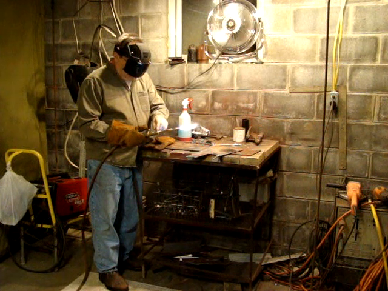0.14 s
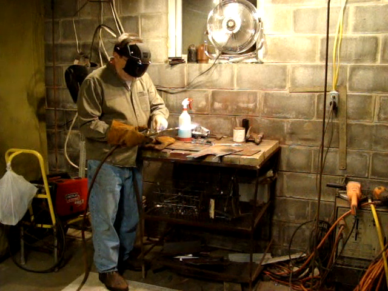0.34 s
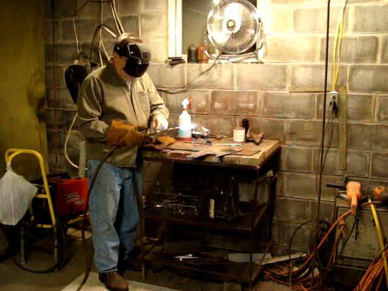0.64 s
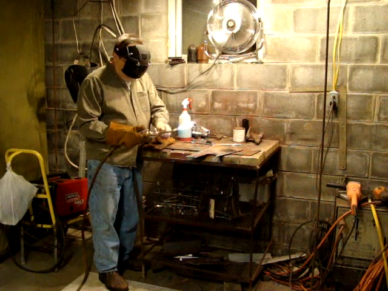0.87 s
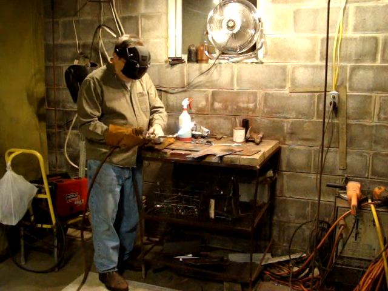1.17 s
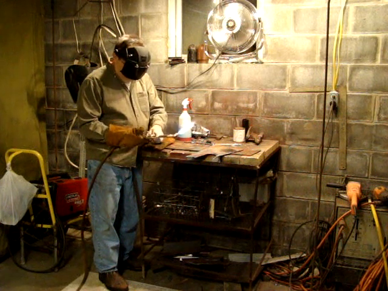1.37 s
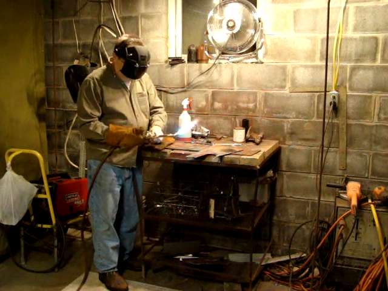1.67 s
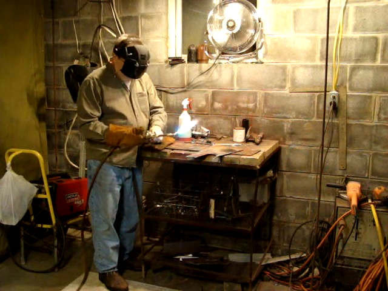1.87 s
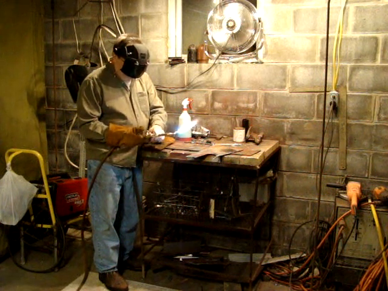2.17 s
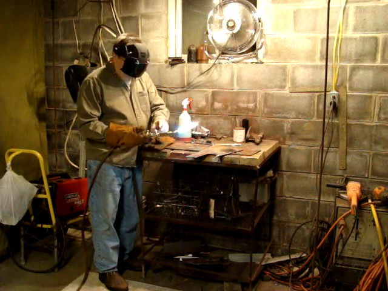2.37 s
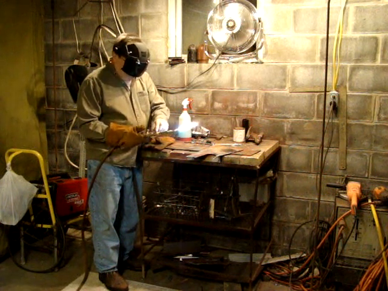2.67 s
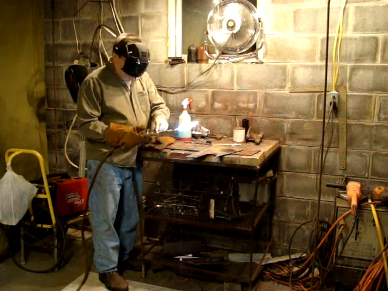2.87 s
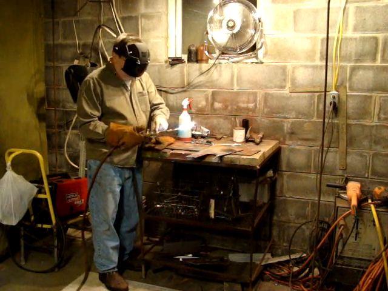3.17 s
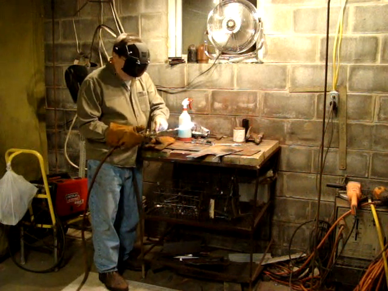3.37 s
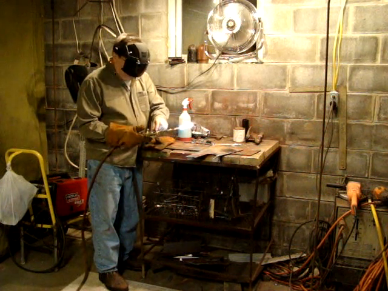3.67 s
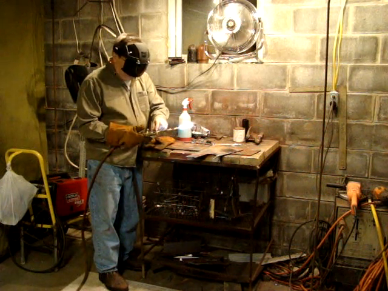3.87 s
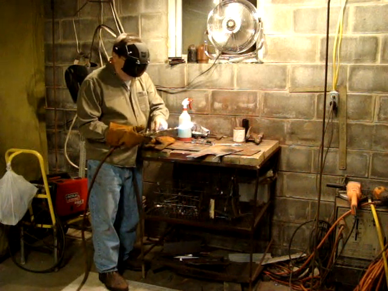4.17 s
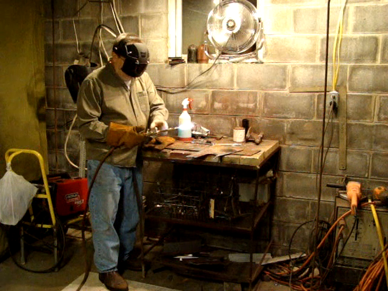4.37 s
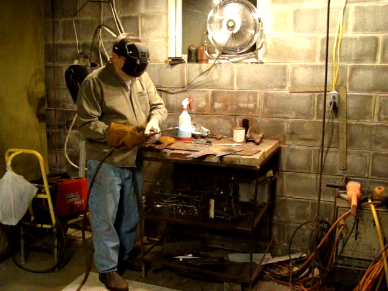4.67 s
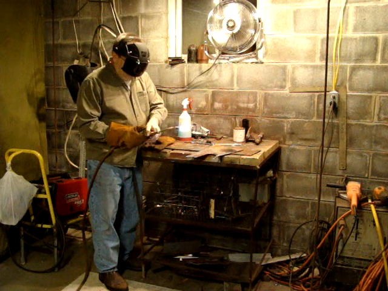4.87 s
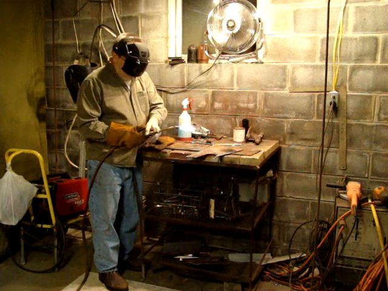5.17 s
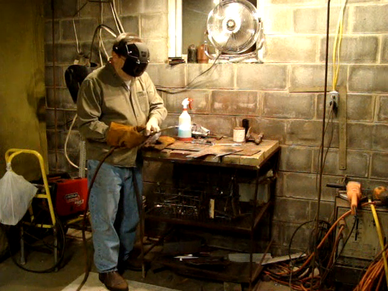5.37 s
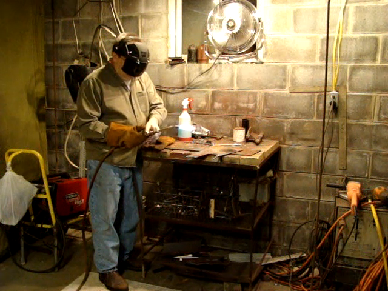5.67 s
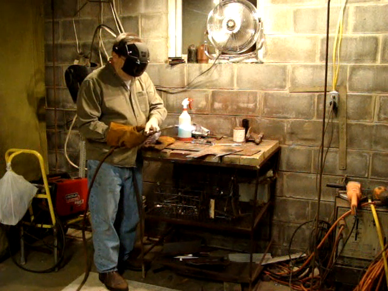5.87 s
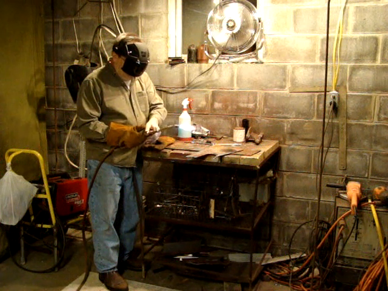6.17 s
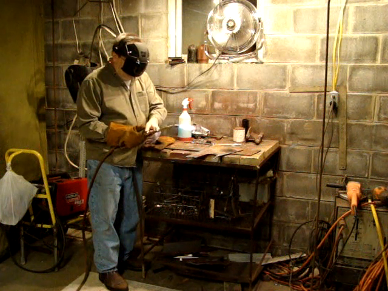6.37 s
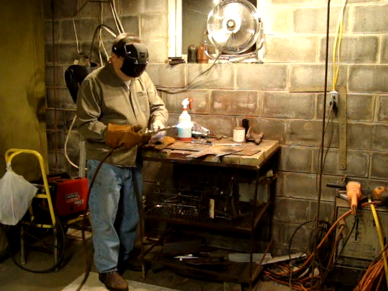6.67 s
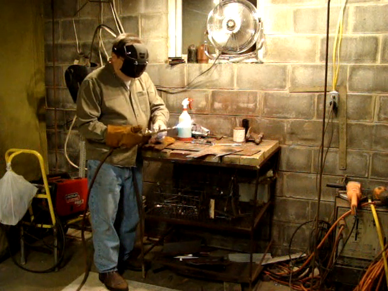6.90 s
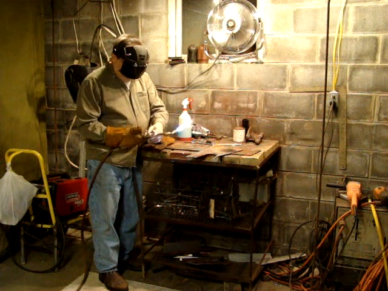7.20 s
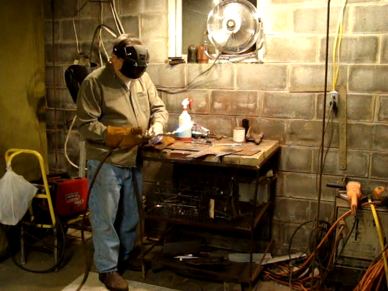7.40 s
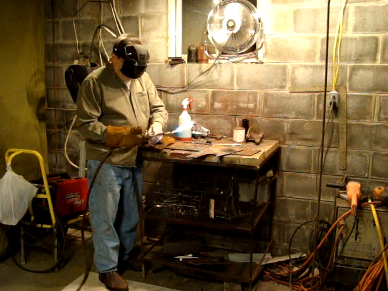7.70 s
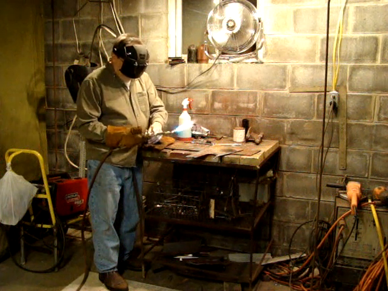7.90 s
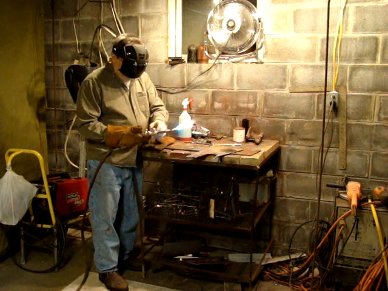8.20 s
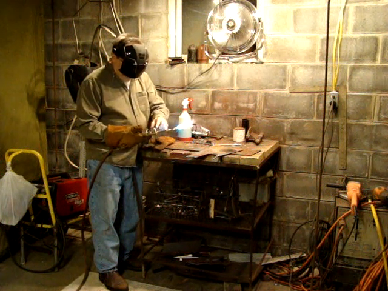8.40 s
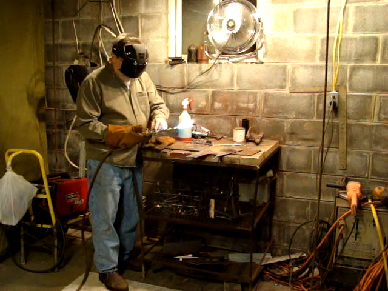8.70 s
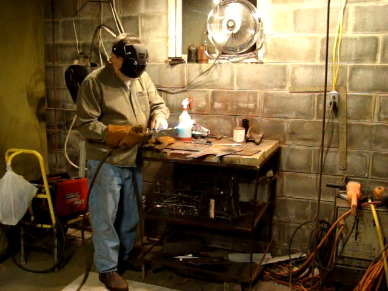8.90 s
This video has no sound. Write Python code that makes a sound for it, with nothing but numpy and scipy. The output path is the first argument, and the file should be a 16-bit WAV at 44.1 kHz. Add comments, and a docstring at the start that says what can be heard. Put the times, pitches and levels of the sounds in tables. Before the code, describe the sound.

A gas torch burns from the start with a steady, bright, slightly flickering hiss. Behind it a window fan whirs softly, with a faint wavering tone that fades somewhat over the first few seconds. From about 3.1 to 3.6 seconds the flame takes on a slightly fuller roar as it plays on steel, and it keeps that roar. At 5.0 seconds a loud, sharp blast of oxygen rushes out for about a quarter of a second, and a second one follows from 5.4 to 5.7 seconds. The torch and fan sound briefly quieter after each blast, creeping back to their earlier level by about 6.3 seconds. The hiss and roar then continue evenly until the end, at around 9 seconds. The place is a small basement workshop with hard walls, which add a short echo and a slightly hollow colour to the rushing sounds.

```python
"""In a small block-walled basement, a window fan whirs and sings while an oxy-acetylene torch burns.
Turbulent gas hisses at the nozzle, and the flame roars more once it plays on the steel. Two presses of
the oxygen lever let out loud jet blasts, at which an automatic gain ducks and then creeps back.
Standing waves colour the rushing noises; the torch also echoes off nearby surfaces and the walls."""
import sys
import numpy as np
from scipy import signal
from scipy.fft import rfft, irfft, next_fast_len
from scipy.io import wavfile
from scipy.ndimage import map_coordinates

SR = 44100
rng = np.random.default_rng(int(sys.argv[2]) if len(sys.argv) > 2 else 0)


def waveform_to_disk(signal):
    """Save audio, clipped to [-1, 1], as 16-bit WAV at the path in sys.argv[1]."""
    frames = np.transpose(np.atleast_2d(signal))
    scaled = np.clip(frames, -1, 1) * 32767
    samples = np.round(scaled).astype(np.int16)
    wavfile.write(sys.argv[1], SR, samples)


N = 399105
TIME = np.arange(N) / SR


def from_db(db):
    """Amplitude ratio: a factor of ten for every 20 dB."""
    return 10 ** (np.asarray(db) / 20)


def unit_rms(x):
    """Normalisation to unit mean power."""
    return x / np.sqrt(np.mean(x ** 2) + 1e-20)


def ramp(start_s, length_s):
    """Linear rise from 0 to 1."""
    return np.clip((TIME - start_s) / length_s, 0, 1)


def lag(x, tau_s):
    """Exponential relaxation: a first-order low-pass with time constant tau_s."""
    pole = np.exp(-1 / (tau_s * SR))
    return signal.lfilter([1 - pole], [1, -pole], x + 1e-18)


def drift(rate_hz):
    """Random fluctuation of unit rms: noise low-passed at rate_hz."""
    hop, run_in = 100, 2000   # samples a step; steps for the filter to settle
    pole = np.exp(-2 * np.pi * rate_hz * hop / SR)
    noise = rng.standard_normal(N // hop + run_in + 2)
    slow = signal.lfilter([1], [1, -2 * pole, pole * pole], noise)[run_in:]
    return np.interp(np.arange(N) / hop, np.arange(len(slow)), unit_rms(slow))


def flow_noise(spectrum, peaks=()):
    """Turbulence gives broadband noise, lifted by resonance at room modes and any given peaks; rms 1."""
    # standing waves between walls, bench and floor: f/Hz, width/Hz, lift/dB
    room_modes = [(74, 20, 5.3), (122, 16, 5), (180, 24, 3), (272, 44, 9.7), (317, 29, 4.8), (430, 17, 4.6),
                  (504, 99, 12.0), (588, 22, 5.0), (658, 61, 10.9), (848, 39, 6.0), (947, 31, 4.9),
                  (1038, 46, 4.3), (1124, 43, 7.0), (1229, 23, 3.9), (1280, 32, 3.6), (1427, 51, 2.9),
                  (1514, 13, 3.1), (1657, 34, 3.1), (1741, 15, 3.9), (1890, 27, 4.5), (2007, 20, 3.7),
                  (2434, 28, 3.8)]
    grid_hz = np.geomspace(10, SR / 2, num=4096)
    points_hz, points_db = np.transpose(spectrum)
    colour_db = np.interp(np.log(grid_hz), np.log(points_hz), points_db)
    colour_db -= 40 * np.log10(np.maximum(points_hz[0] / grid_hz, 1))   # bass falls 12 dB an octave
    for hz, width_hz, lift_db in [*room_modes, *peaks]:
        colour_db += lift_db * .5 ** ((2 * (grid_hz - hz) / width_hz) ** 2)
    size = next_fast_len(N, True)
    bins_hz = np.arange(size // 2 + 1) * SR / size
    gain = np.interp(bins_hz, grid_hz, from_db(colour_db)) * (bins_hz < points_hz[-1])
    white = rfft(rng.standard_normal(size))
    return unit_rms(irfft(white * gain, size)[:N])


def basement(x, t60_s, wet_db, shift_hz):
    """Reverberation: dense wall reflections decay exponentially; their pattern shifts as the torch moves."""
    t = TIME[:SR // 2]
    build_up = 1 - np.exp(-t / 0.0059)
    tails = rng.standard_normal((2, len(t))) * from_db(-60 * t / t60_s) * build_up
    above_modes = signal.butter(2, 1200, "high", fs=SR, output="sos")   # standing waves rule below
    tails = signal.sosfilt(above_modes, tails)
    here, there = [signal.fftconvolve(x, tail / np.linalg.norm(tail))[:N] for tail in tails]
    angle = 2 * np.pi * shift_hz * TIME
    reflections = np.cos(angle) * here + np.sin(angle) * there
    wet = from_db(wet_db)
    return (x + wet * reflections) / np.sqrt(1 + wet ** 2)


def near_echoes(x, sway, sway_hz):
    """Comb filtering: echoes interfere with the direct sound, their paths changing as the nozzle sways."""
    # reflections off the steel, the bench and the wall behind it: delay/s, amplitude ratio
    echoes = [(.0017, .2), (.0029, .26), (.0044, .16), (.0068, .18)]
    treble = x - lag(x, 1 / (2 * np.pi * 3000))   # small surfaces mirror only short waves
    out = x.copy()
    for delay_s, share in echoes:
        delay_samples = delay_s * SR * (1 + sway * drift(sway_hz))
        out += share * map_coordinates(treble, [np.arange(N) - delay_samples], order=1)
    return out


def fan(tone_hz, shaft_hz, air_db, sideband_db):
    """Tonal and broadband fan noise: a wavering tone, a sideband one shaft rate higher, turbulent air."""
    # spectrum of the rushing air: f/Hz, relative level/dB
    air_spectrum = [(25, -28), (45, -17), (70, -14.5), (100, -21), (125, -21), (150, -7.5), (190, -6),
                    (270, -4), (380, 2), (520, -8.5), (780, 9.5), (1000, -3), (1800, -6.5), (2600, -20),
                    (5000, -21)]
    start_db, settled_db, settle_s = -33, -40.8, 3.8
    tone_db = settled_db + (start_db - settled_db) * np.exp(-TIME / settle_s)
    phase = 2 * np.pi * np.cumsum(tone_hz + .9 * drift(4)) / SR
    tone = np.sin(phase) * from_db(1.1 * drift(9))
    sideband_phase = phase + 2 * np.pi * shaft_hz * TIME + drift(3)
    sideband = np.sin(sideband_phase) * from_db(sideband_db + 3 * drift(5))
    air = from_db(air_db) * flow_noise(air_spectrum)
    return np.sqrt(2) * from_db(tone_db) * (tone + sideband) + air


def flame(flicker_db, tremor_db, flutter_db, wander_db):
    """Jet and combustion noise: gas hisses from the preheat holes; the plume roars, more so on steel."""
    # spectra of the nozzle's hiss, its beamed top and the burning plume: f/Hz, relative level/dB
    hiss_spectrum = [(500, -36), (1500, -8.5), (2600, -17.5), (3300, -3), (4100, -3), (5000, 1.5),
                     (5800, 2), (6700, 1), (7500, 2), (8500, 0.5), (10500, -21)]
    sizzle_spectrum = [(5000, -24.5), (7000, -12.5), (8000, -4.5), (8600, 2.5), (9600, 5.5), (10500, -3.5)]
    roar_spectrum = [(100, -45), (190, -16.5), (280, -10), (390, -5.5), (500, -7), (750, 0.5), (1000, -1.5),
                     (1900, 2.5), (2500, -1), (3500, -3), (5000, -16.5), (10000, -23)]
    # faint resonances in the hiss: f/Hz, width/Hz, lift/dB
    nozzle_peaks = [(4740, 70, 3), (5050, 80, 3), (5800, 110, 3), (6080, 70, 2.5), (7470, 70, 3.5)]
    # directivity, as the nozzle points more or less at the listener: t/s, lift of the beamed top/dB
    aim = [(0, 0), (1.2, 1.0), (2.1, -1.1), (3.3, -0.8), (4.5, 0), (6.4, .4), (7.2, -1.3), (9.05, -0.4)]
    aim_db = np.interp(TIME, *np.transpose(aim))
    onto_steel = ramp(start_s=3.13, length_s=0.45)
    hiss_db = -26.5 + .45 * aim_db
    sizzle_db = -26 + aim_db
    roar_db = -32.8 + 3.8 * onto_steel + .55 * aim_db
    hiss = flow_noise(hiss_spectrum, nozzle_peaks) * from_db(hiss_db + flicker_db * drift(11))
    # short waves are beamed, so they flicker with every tremor of the nozzle
    sizzle = flow_noise(sizzle_spectrum) * from_db(sizzle_db + tremor_db * drift(30))
    roar = flow_noise(roar_spectrum) * from_db(roar_db + wander_db * drift(1.7) + flutter_db * drift(25))
    return hiss + sizzle + roar


def oxygen_jet(valve_s, seep_s, seep_db):
    """Turbulent jet noise: oxygen rushes from the centre bore for as long as the lever is held."""
    # strokes of the cutting-oxygen lever: press t/s, release t/s, jet level/dB
    lever = [(5.017, 5.235, -12.5), (5.434, 5.681, -13)]
    # spectrum of the jet: f/Hz, relative level/dB
    jet_spectrum = [(200, -57), (700, -14.5), (1200, -9.5), (1900, -2.5), (2700, -3.5), (4000, 0),
                    (5500, -1.5), (7000, -2.5), (8500, -1.5), (10500, -2.5)]
    opening = sum(from_db(db) * ((TIME > press) & (TIME < release)) for press, release, db in lever)
    # as the lever is first squeezed, a little oxygen seeps through ahead of the blast
    first_press_s = lever[0][0]
    seep = from_db(seep_db) * ramp(first_press_s - seep_s, seep_s) * (TIME < first_press_s)
    return flow_noise(jet_spectrum) * lag(opening + seep, valve_s)


def scene():
    """Superposition of the torch, its reflections and the fan at one microphone."""
    burning = flame(flicker_db=0.37, tremor_db=1.4, flutter_db=0.2, wander_db=-0.1)
    blasts = oxygen_jet(valve_s=.012, seep_s=.25, seep_db=-27)
    torch = near_echoes(burning + blasts, sway=0.059, sway_hz=0.233)
    torch = basement(torch, t60_s=.33, wet_db=-7.5, shift_hz=.2)
    mono = torch + fan(tone_hz=788.8, shaft_hz=24.14, air_db=-39.5, sideband_db=-12.5)
    return np.array([mono, mono])


def gain_control(x, threshold_db, slope, attack_s, release_db_per_s):
    """Dynamic compression: loud sound pulls the gain down quickly; it recovers at a steady rate."""
    level_db = 10 * np.log10(lag(x[0] ** 2, 0.025) + 1e-12)
    cut_db = slope * np.maximum(level_db - threshold_db, 0)
    recovery_db = release_db_per_s * TIME
    held_db = np.maximum.accumulate(cut_db + recovery_db) - recovery_db
    return x * from_db(-lag(held_db, attack_s))


def record(dry):
    """Compression, then band limiting: a steep low-pass removes the highest treble."""
    compressed = gain_control(dry, threshold_db=-21.5, slope=0.66, attack_s=0.0042, release_db_per_s=15.0)
    cutoff_hz = 10020
    low_pass = signal.ellip(14, .1, 90, cutoff_hz, fs=SR, output="sos")
    return signal.sosfilt(low_pass, compressed)


dry = scene()
out = record(dry)
waveform_to_disk(out)
```